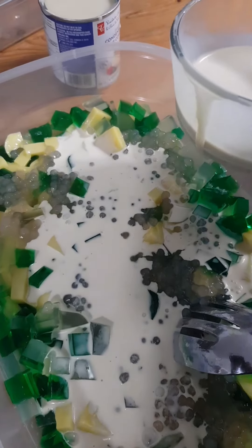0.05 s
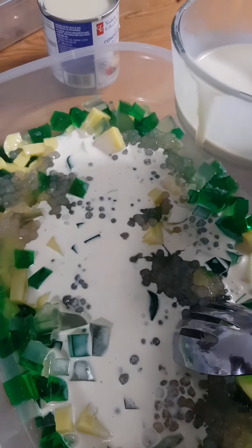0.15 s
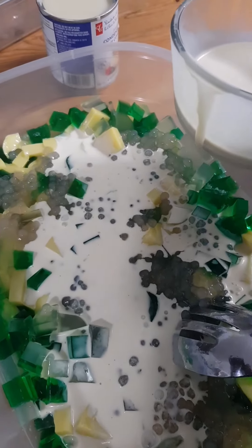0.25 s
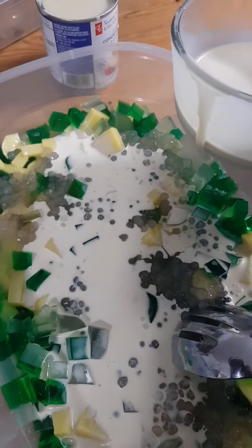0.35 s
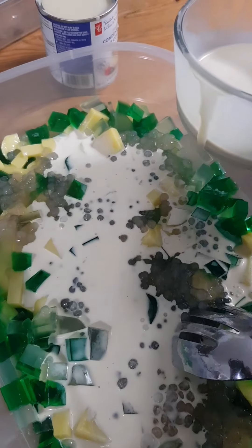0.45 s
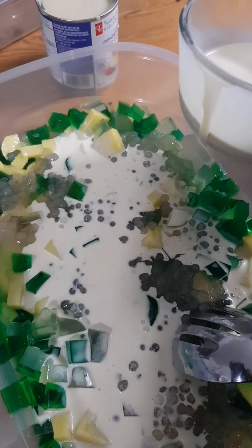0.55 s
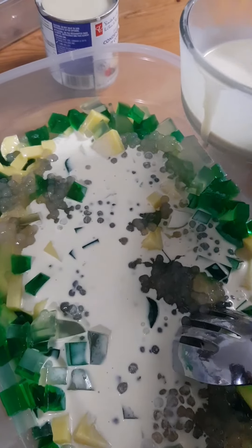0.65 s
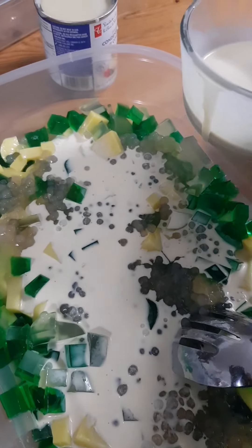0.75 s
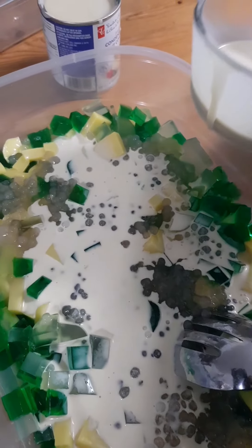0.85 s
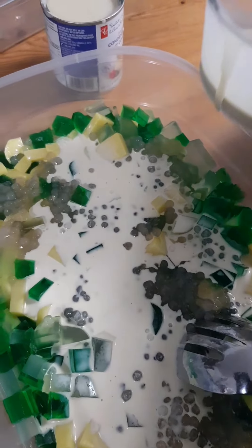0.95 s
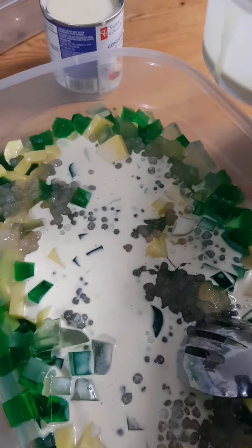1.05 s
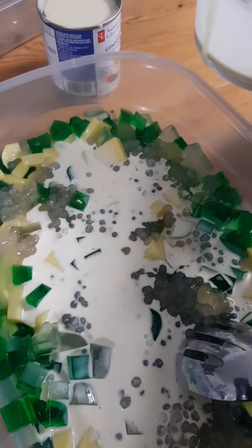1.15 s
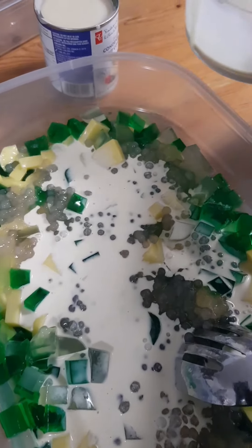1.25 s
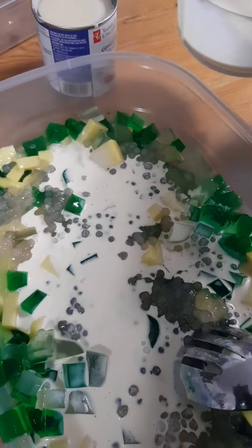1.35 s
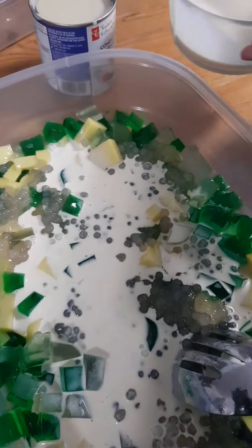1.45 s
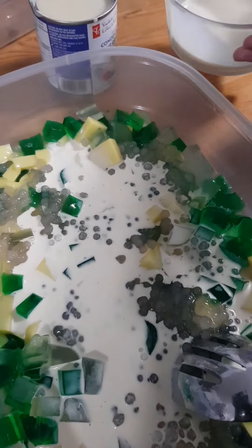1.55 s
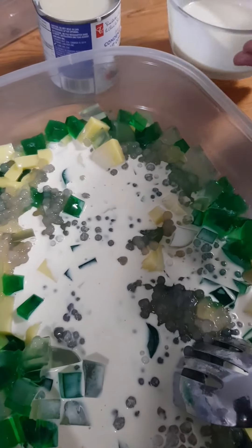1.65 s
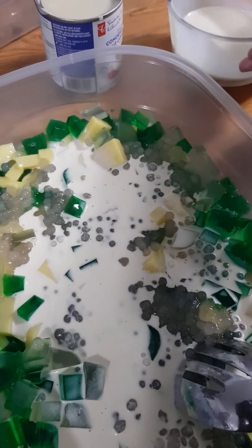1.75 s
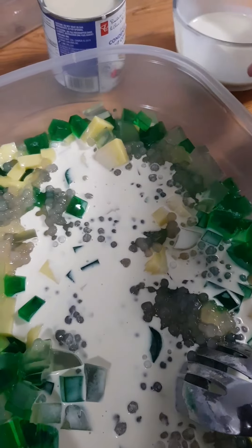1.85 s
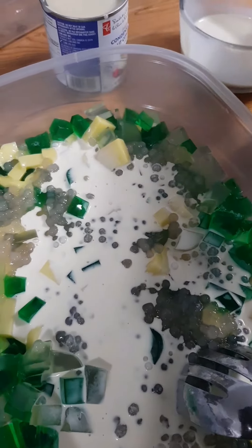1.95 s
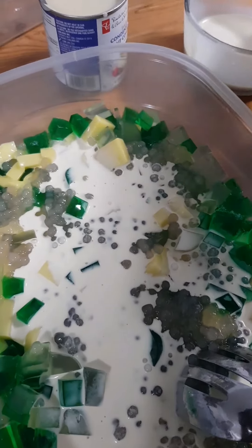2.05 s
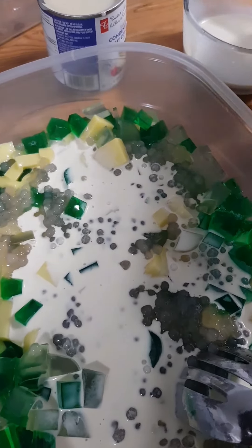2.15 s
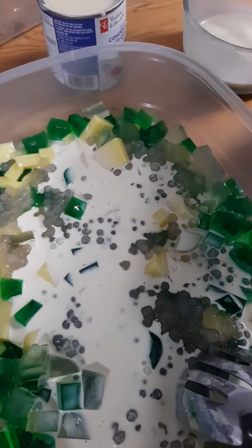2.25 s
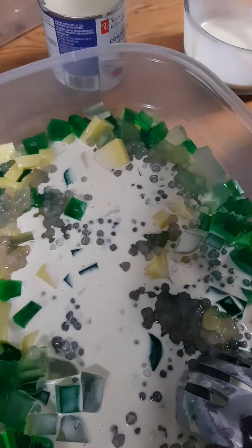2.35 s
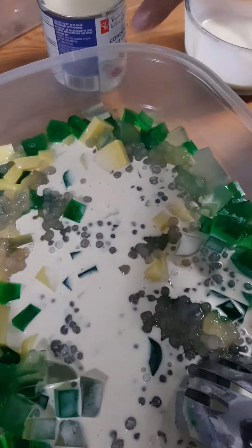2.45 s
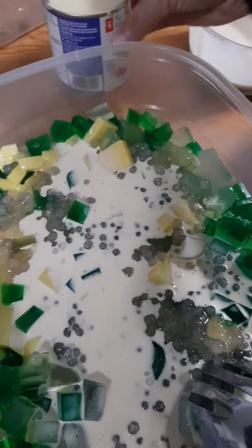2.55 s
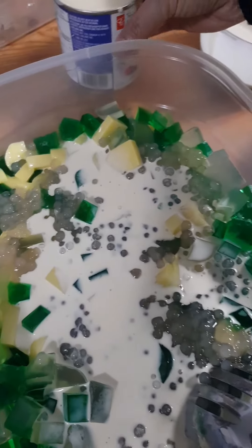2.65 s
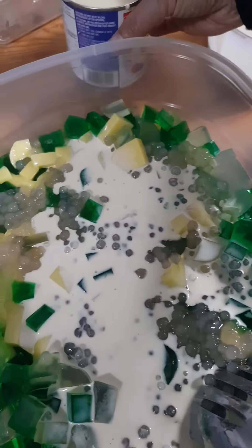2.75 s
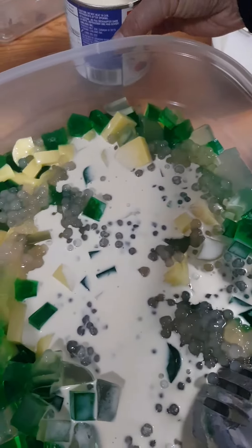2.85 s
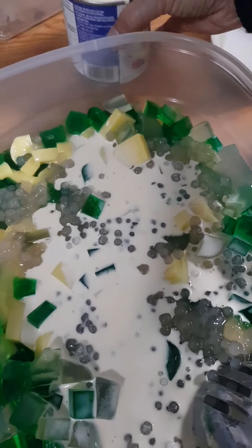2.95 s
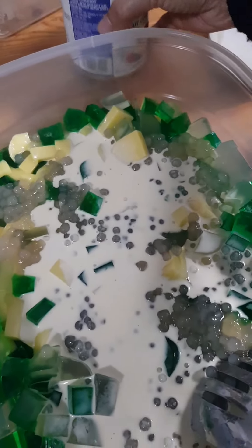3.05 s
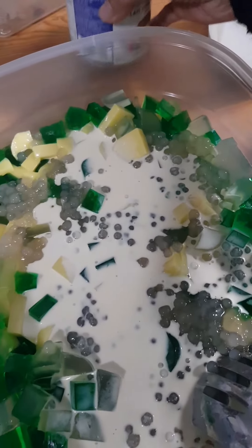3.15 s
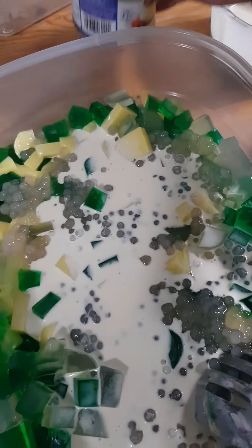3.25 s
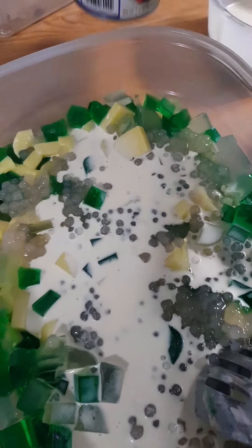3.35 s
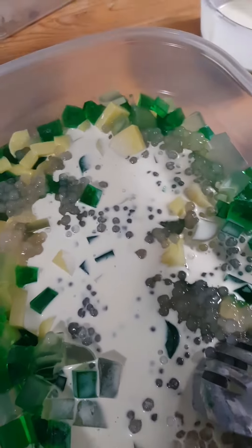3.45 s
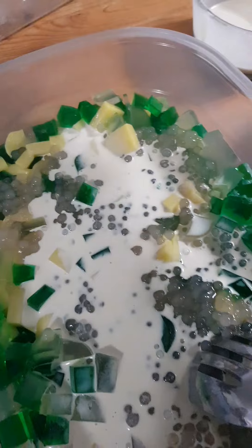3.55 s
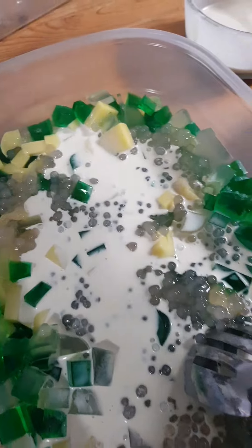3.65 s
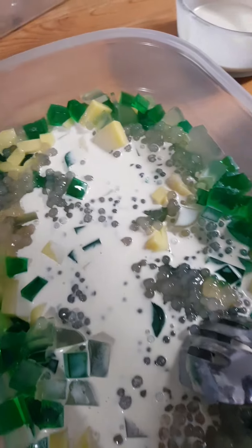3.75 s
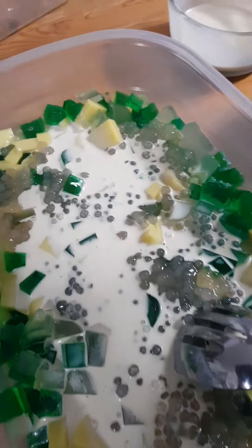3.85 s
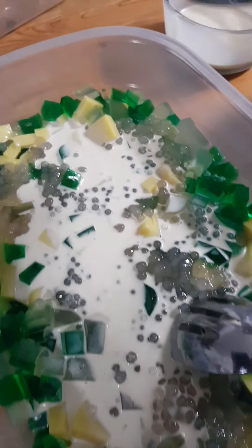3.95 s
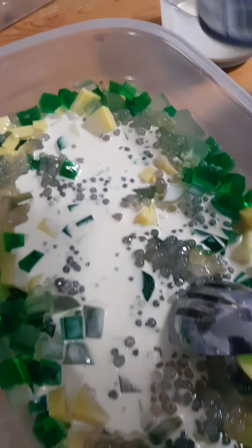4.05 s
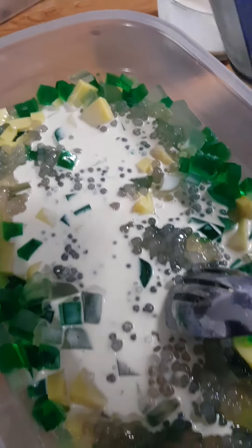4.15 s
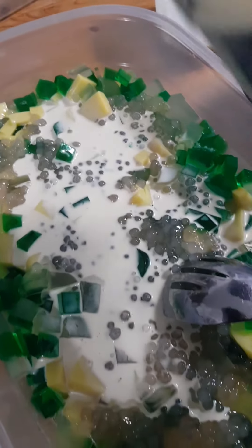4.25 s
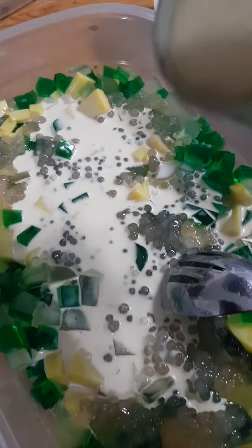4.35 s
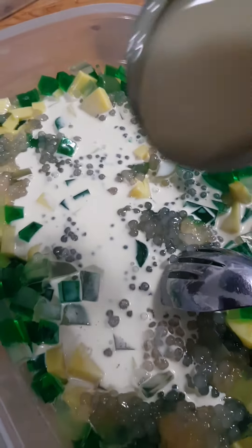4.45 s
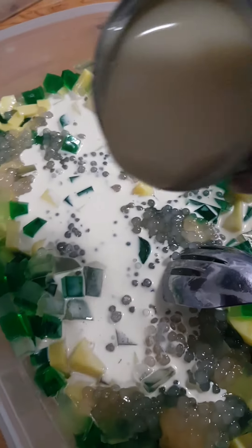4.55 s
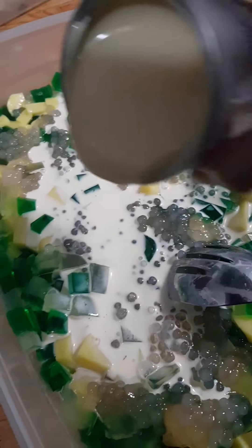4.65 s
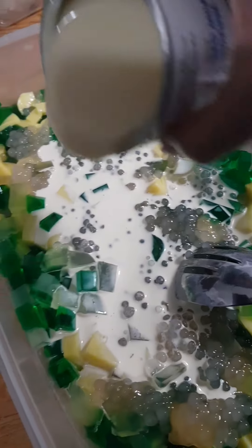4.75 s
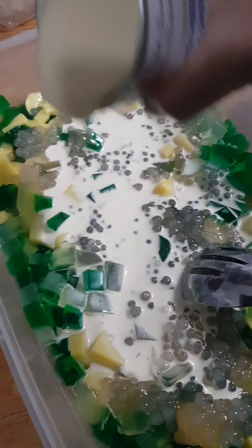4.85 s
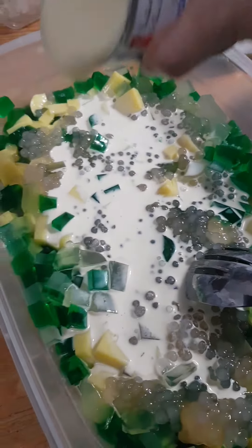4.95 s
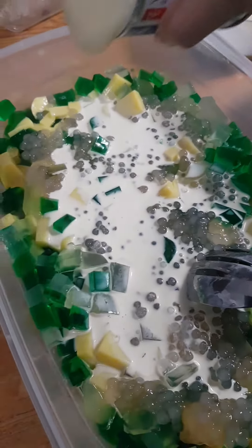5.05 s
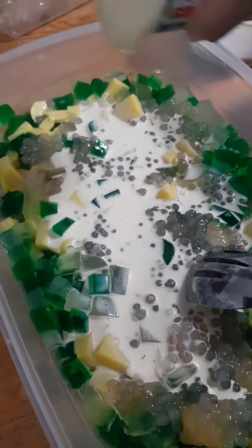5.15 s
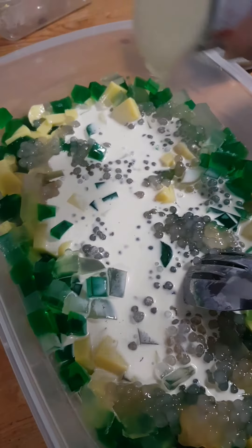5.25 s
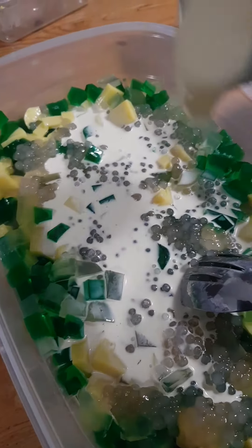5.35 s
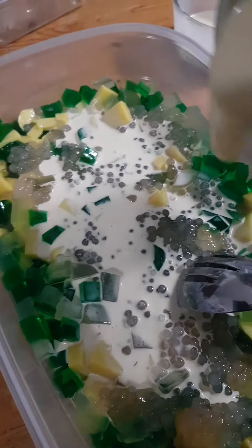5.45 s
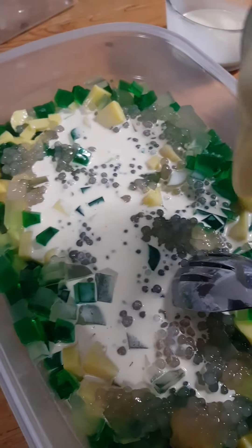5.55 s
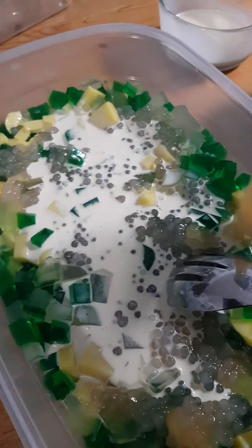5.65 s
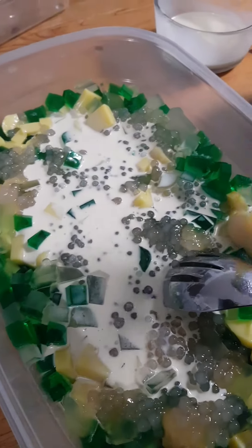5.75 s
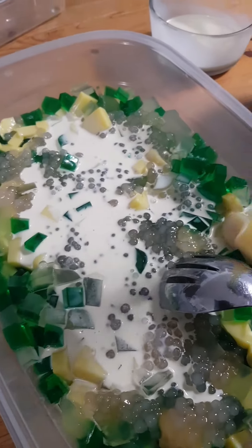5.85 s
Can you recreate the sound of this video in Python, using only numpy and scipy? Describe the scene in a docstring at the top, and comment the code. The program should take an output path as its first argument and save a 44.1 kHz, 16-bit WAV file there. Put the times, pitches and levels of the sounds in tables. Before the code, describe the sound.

A heavy glass bowl knocks once on a wooden table and rattles to rest, then faint can-handling sounds over a low fridge hum.

```python
"""In a kitchen, a glass bowl is set down on a wooden table near a phone: one hard knock, then it rocks and settles.
Each blow is a pulse that rings the table's modes and sets off a short scrape; the glass adds one brief ping.
Fingers tick, tap and rub against a can and a plastic tub: decaying noise bands, short tones and grainy noise.
A fridge hums as a stack of wavering tones, with shaped noise for low rumble and microphone hiss,
and a thin tone that comes and goes. The kitchen answers bowl and fingers with a dense noisy tail."""
import sys
import numpy as np
from scipy import signal
from scipy.fft import rfft, irfft
from scipy.io import wavfile
from scipy.ndimage import uniform_filter1d

SR = 44100
rng = np.random.default_rng(int(sys.argv[2]) if len(sys.argv) > 2 else 0)


def dump_mix(stems):
    """Bounce the given channels to the path in sys.argv[1] as a 16-bit WAV at rate SR."""
    frames = np.atleast_2d(stems).T  # one column per channel
    limited = np.clip(frames, -1, 1)  # hard clip at full scale
    pcm = np.round(limited * 32767).astype(np.int16)
    wavfile.write(sys.argv[1], SR, pcm)


N = 261072  # length in samples
T = np.arange(N) / SR


def undb(db):
    """Decibels to amplitude."""
    return 10 ** (np.asarray(db) / 20)


def unit(x):
    """Scale to an RMS of 1."""
    return x / np.sqrt(np.mean(x ** 2))


def sides(pan_db):
    """Left and right gains that differ by pan_db."""
    return undb(np.array([[pan_db], [-pan_db]]) / 2)


def fade(t, t60):
    """Exponential decay that falls 60 dB in t60 seconds."""
    return np.exp(-np.log(1000) * t / t60)


def on_log(table, hz):
    """Read a table between its points along a log frequency axis."""
    table_hz, values = np.transpose(table)
    return np.interp(np.log(np.maximum(hz, 1)), np.log(table_hz), values)


def band(x, hz, width_hz):
    """Band-pass around hz, edges spaced evenly on a log axis."""
    top = min(width_hz / 2 + np.hypot(hz, width_hz / 2), SR / 2.2)
    bottom = hz * hz / top * .999
    return signal.sosfilt(signal.butter(2, [bottom, top], "band", fs=SR, output="sos"), x)


def walk(rate):
    """Random levels held 1 / rate s and slewed twice; spread near 1."""
    hold = int(SR / rate)
    steps = np.repeat(rng.standard_normal(N // hold + 1), hold)
    return 1.3 * uniform_filter1d(uniform_filter1d(steps, hold), hold)[:N]


# likeness of left and right in diffuse sound: freq_hz, likeness [0-1]
LIKENESS = [(60, 0.81), (290, 0.91), (640, 0.3), (1400, .0)]


def diffuse(size):
    """Stereo noise whose two sides are alike in the bass and unrelated in the treble."""
    mid, side = rfft(rng.standard_normal((2, size)))
    alike = np.clip(on_log(LIKENESS, np.fft.rfftfreq(size, 1 / SR)), 0, 1)
    mid = mid * np.sqrt((1 + alike) / 2)
    side = side * np.sqrt((1 - alike) / 2)
    return irfft(np.array([mid + side, mid - side]), size)


def coloured(x, spectrum):
    """Shape noise by a spectrum in dB and scale it to an RMS of 1."""
    gain = undb(on_log(spectrum, np.fft.rfftfreq(N, 1 / SR)))
    return unit(irfft(rfft(x) * gain, N))


def tail(x, bands, start_s, spread):
    """A dense noisy answer to x that swells in around start_s and dies band by band."""
    t = T[:SR // 2]
    noise, answer = diffuse(len(t)), 0
    swell = np.clip(t / start_s - .5, 0, 1)
    for hz, db, t60 in bands:
        part = band(noise, hz, hz * spread) * fade(t, t60) * swell
        # even out the energy of long and short decays
        answer = answer + undb(db) * part / np.sqrt(t60 * SR / np.log(1e6))
    mono = x.mean(0, keepdims=True)
    return signal.fftconvolve(mono, answer, axes=1)[:, :N]


def burst(s, db, hz, width_hz, t60, pan_db):
    """A short decaying burst in one band; narrow bands build up more slowly."""
    out, t, start = np.zeros((2, N + SR)), T[:SR // 4], int(s * SR)
    noise = band(diffuse(SR // 2), hz, width_hz)[:, SR // 4:]
    x = noise * fade(t, t60) * np.minimum(t * width_hz * 2, 1)
    x = x / np.abs(x).max(1, keepdims=True)
    out[:, start:start + len(t)] = undb(db) * sides(pan_db) * x
    return out[:, :N]


def ring(s, db, hz, t60, pan_db, rise_s):
    """One struck mode: a sine that rises briefly and dies away."""
    t = np.maximum(T - s, 0)
    tone = np.sin(2 * np.pi * hz * t) * fade(t, t60) * np.minimum(t / rise_s, 1)
    return undb(db) * sides(pan_db) * tone


# fridge tones, partly multiples of the compressor speed: pitch_hz, level_db (before HUM_DB)
FRIDGE_TONES = [(58.7, -67), (82.1, -68.5), (164.2, -70.5), (185.7, -67.5), (211.5, -53), (245.6, -64.5),
                (265, -76.5), (293.6, -68), (352.3, -73), (411.3, -67), (423.5, -80), (470, -80),
                (512, -83), (705, -87.5), (881, -90.5)]
# where the hum sits: pitch_hz, left_minus_right_db
HUM_PLACE = [(60, 3.5), (300, 2), (420, -.5), (900, -2)]
HUM_DB, HUM_WAVER_DB, MAIN_WAVER_DB = -0.66, 3, 1.5  # the strongest tone is the steadiest


def fridge():
    """Compressor tones, each drifting in phase and wavering in level."""
    hum, top_db = 0, max(db for _, db in FRIDGE_TONES)
    for hz, db in FRIDGE_TONES:
        phase = 2 * np.pi * (hz * T + rng.random() + 0.25 * walk(5))
        waver_db = MAIN_WAVER_DB if db == top_db else HUM_WAVER_DB
        level = np.sqrt(2) * undb(db + waver_db * walk(6))
        hum = hum + level * sides(on_log(HUM_PLACE, hz)) * np.sin(phase)
    return undb(HUM_DB) * hum


# rumble of the kitchen, relative shape: freq_hz, density_db (per Hz)
RUMBLE_SHAPE = [(22, -7), (40, -4.5), (60, 4), (85, -6), (125, -11.5), (190, -5.5), (260, -7.5), (400, -12),
                (520, -18.5), (640, -24), (900, -29.5), (1400, -39), (2500, -62)]
RUMBLE_DB = -57


def low_rumble():
    """Diffuse noise weighted to the bass, its level wavering by about 1 dB."""
    return undb(RUMBLE_DB) * coloured(diffuse(N), RUMBLE_SHAPE) * undb(walk(11))


# microphone self-noise, relative shape: freq_hz, density_db (per Hz)
HISS_SHAPE = [(710, -35), (1200, -7.5), (1510, -2.5), (2380, -5.5), (5180, -8), (5470, -6.5), (5710, -7.5),
              (8440, -15.5), (12100, 0.5), (14800, 0.5), (16000, -4.5)]
HISS_DB, HISS_PAN_DB = -71, 0.88


def microphone_hiss():
    """Self-noise, independent in each microphone."""
    return undb(HISS_DB) * coloured(rng.standard_normal((2, N)), HISS_SHAPE) * sides(HISS_PAN_DB)


# the thin tone comes and goes: time_s, level_db (before its waver)
WHINE_LEVEL = [(0, -98), (.7, -90), (1.1, -98), (1.4, -110), (5.92, -105)]
WHINE_HZ, WHINE_WAVER_DB = 5464, 5.5


def thin_whine():
    """One steady high sine whose level wavers."""
    level_db = np.interp(T, *np.transpose(WHINE_LEVEL)) + WHINE_WAVER_DB * walk(12)
    return undb(level_db) * np.sin(2 * np.pi * WHINE_HZ * T)


# hum, rumble and hiss swell and sink together: time_s, level_db
SWELL = [(0, -0.2), (.8, -0.3), (1.6, 0.84), (2.2, -1.3), (2.7, -0.8), (3.4, -3), (4.1, -1.3), (4.4, -.1),
         (5.1, -0.94), (5.92, 0.6)]


def background():
    """Fridge, rumble and hiss share one slow swell; the whine keeps its own."""
    steady = fridge() + low_rumble() + microphone_hiss()
    return undb(np.interp(T, *np.transpose(SWELL))) * steady + thin_whine()


# dry little ticks: start_s, peak_db, centre_hz, left_minus_right_db
DRY_TICKS = [(1.6252, -54.5, 6230, -6), (2.053, -67.5, 5470, 11), (3.542, -67, 5600, -5),
             (5.7252, -60, 10800, 1), (5.7254, -65, 6100, -4), (5.748, -64, 6200, -5)]
TICK_WIDTH_HZ, TICK_T60_S = 1900, .022


def ticks():
    """Tiny contacts heard as short noise bursts, each in one treble band."""
    out = 0
    for s, db, hz, pan_db in DRY_TICKS:
        out = out + burst(s, db, hz, TICK_WIDTH_HZ, TICK_T60_S, pan_db)
    return out


# the kitchen's answer: centre_hz, level_db, t60_s
ROOM_BANDS = [(88.8, -12, .3), (170, -4.5, .3), (353.4, -6, 0.29), (716, -4, .3), (1440, -3.5, 0.19),
              (3054, -10.5, .25), (5760, -2.5, .2), (11480, -10.5, 0.16)]


def kitchen(x):
    """Walls and cupboards answer after a few milliseconds."""
    return tail(x, ROOM_BANDS, 0.0049, 0.59)


# bowl foot meets the table: start_s, blow_db, edge [0-1 across the foot]
BLOWS = [(1.8663, -5.5, 0.19), (1.8739, -26, 0), (1.891, -18.5, 0.5), (1.942, -23.5, .6), (1.960, -31, .64),
         (1.989, -24, 1), (2.008, -37, 0.97), (2.031, -42, 1), (2.056, -25, 0.8), (2.0708, -20, 1),
         (2.0779, -25.5, .6), (2.094, -28.5, .9)]
# table modes: pitch_hz, near_db (struck by edge 0), far_db (struck by edge 1), t60_s, left_minus_right_db
TABLE_MODES = [(60, -0.5, -7, .3, 1.5), (87.9, 1, -9.5, 0.15, 2), (124.1, -2.5, -10, 0.17, 2.5),
               (204.7, -20, -22, .15, 3.5), (263.3, -12, -4, 0.0807, 4), (327.3, -14, -14, 0.081, 6.5),
               (350, -11, -2.5, 0.011, 6), (372.7, -9, -18.5, 0.11, -1), (479, -26, -23, 0.061, -8),
               (585.5, -19.5, -23.5, 0.11, 0.5), (661, -24.5, -27.5, .08, -9.5),
               (714, -23.5, -24, .1, -7.5), (793, -29, -29.5, 0.083, -15.5),
               (1037, -21.5, -29.5, 0.073, -0.5), (1168, -27.5, -28.5, 0.101, -9)]
# upper table modes, too dense to tell apart: centre_hz, level_db, t60_s
DENSE_MODES = [(892, -4.5, 0.12), (1270, 2, .2), (1816, 9.5, .17), (2370, 8, .15)]
# gritty scrape of glass on wood: centre_hz, level_db (against the scrape's blow), t60_s
SCRAPE_BANDS = [(3004, -57, 0.2), (5170, -61, .18), (8500, -58, .03), (12500, -60, .05)]
# contact at a 0 dB blow; weaker blows last longer by this share per dB
CONTACT_MS, LONGER_PER_DB = .7, 0.0144
# scrape against its blow; it lessens as the bowl stops sliding
SCRAPE_DB, SETTLE_DB_PER_S = 3.5, -120
JERK_DB = 1
PORT_LAG_MS = 0.29  # the table's sound reaches the right port later


def bowl():
    """Each blow jerks the table top back and forth once, rings its modes and scrapes briefly."""
    near, far, strike = np.zeros((3, N))
    for s, db, edge in BLOWS:
        contact_s = CONTACT_MS / 1000 * (1 - LONGER_PER_DB * db)
        u = (T - s) / contact_s
        pulse = undb(db) * (1 - 3 * u ** 2) / (1 + u ** 2) ** 3  # acceleration under a rounded push
        near += (1 - edge) * pulse
        far += edge * pulse
        scrape_db = db + SCRAPE_DB + SETTLE_DB_PER_S * (s - BLOWS[0][0])
        strike[int((s - 2 * contact_s) * SR)] = undb(scrape_db)

    jerk, t = near + far, T[:SR // 2]
    out = undb(JERK_DB) * jerk + tail(jerk[None], DENSE_MODES, 0.0009, 0.47)
    for hz, near_db, far_db, t60, pan_db in TABLE_MODES:
        mode = np.sin(2 * np.pi * hz * t) * fade(t, t60) * 2 * np.pi * hz / SR
        push = undb(near_db) * near + undb(far_db) * far
        out += sides(pan_db) * signal.fftconvolve(push, mode)[:N]
    out[1] = np.roll(out[1], int(PORT_LAG_MS * SR / 1000))

    grit = diffuse(N)
    for hz, db, t60 in SCRAPE_BANDS:
        envelope = signal.fftconvolve(strike, fade(t, t60))[:N]
        out += undb(db) * envelope * unit(band(grit, hz, hz * .6))
    return out


def glass_ping():
    """The glass rings once, briefly, in a single high mode."""
    return ring(s=1.897, db=-41, hz=4360, t60=.013, pan_db=-5, rise_s=.003)


# fingers grip the can: start_s, level_db, brightness_db (per octave), left_minus_right_db
CAN_GRIPS = [(2.5478, -43, 2, 4.5), (2.5514, -42, 2, 1), (2.578, -42, -2, 5), (2.585, -32.5, -1.2, -0.5)]
# broad rings of the full can: centre_hz, width_hz, level_db (against the grip), t60_s
CAN_RINGS = [(259, 250, -1, 0.052), (725, 700, 1, 0.038), (1900, 1600, -5, .04), (3800, 2000, -8, .03),
             (6500, 3000, -14, .016), (11500, 6000, -17, .02)]


def grips():
    """Each grip excites the full can's broad rings, tilted brighter or duller."""
    out, pivot_hz = 0, CAN_RINGS[1][0]
    for s, db, bright_db, pan_db in CAN_GRIPS:
        for hz, width_hz, ring_db, t60 in CAN_RINGS:
            tilt_db = bright_db * np.log2(hz / pivot_hz)
            out = out + burst(s, db + ring_db + tilt_db, hz, width_hz, t60, pan_db)
    return out


# skin dragged on metal, plastic and cloth: start_s, length_s, level_db, centre_hz
SKIN_RUBS = [(2.549, .12, -62, 12500), (2.553, 0.074, -52, 2000), (2.586, .13, -62, 2400),
             (2.76, .085, -76, 5500), (2.984, 0.21, -63, 589), (4.234, 0.082, -70, 1500),
             (4.44, .11, -70, 1370), (5.718, 0.35, -73.5, 6100), (5.722, .1, -71, 11000),
             (5.844, 0.09, -71, 690)]
RUB_WIDTH = .6  # share of the centre


def rubs():
    """Grainy friction that starts quickly and thins out."""
    noise, out = diffuse(N) * undb(0.88 * walk(370)), 0
    for s, length_s, db, hz in SKIN_RUBS:
        u = np.clip((T - s) / length_s, 0, 1)
        shape = np.minimum(u / .15, 1) * (1 - u) ** 2
        out = out + shape * undb(db) * unit(band(noise, hz, hz * RUB_WIDTH))
    return out


# soft hollow taps: start_s, level_db, pitch_hz, left_minus_right_db
HOLLOW_TAPS = [(4.2334, -57, 1016, -9), (4.4365, -58.5, 1325, -7)]
TAP_T60_S = .03
OVERTONE, OVERTONE_DB = 1.82, -5.5  # second mode: pitch ratio and level against the first


def taps():
    """A pure low mode under a noisier, shorter second mode."""
    out = 0
    for s, db, hz, pan_db in HOLLOW_TAPS:
        over_hz = hz * OVERTONE
        out = out + ring(s, db, hz, TAP_T60_S, pan_db, rise_s=.0012)
        out = out + burst(s, db + OVERTONE_DB, over_hz, hz * .25, TAP_T60_S / OVERTONE, pan_db)
    return out


def scene():
    """Bowl and fingers, the kitchen's answer to them, and the background."""
    touch = ticks() + grips() + rubs() + taps()
    knock, ping = bowl(), glass_ping()
    to_room = knock + undb(-8) * ping + undb(0.5) * touch
    return knock + ping + touch + kitchen(to_room) + background()


BOTTOM_HZ, TOP_HZ = 42.3, 15550


def record(dry):
    """The phone drops the deepest bass and cuts the top steeply."""
    lean = signal.sosfilt(signal.butter(4, BOTTOM_HZ, "high", fs=SR, output="sos"), dry)
    return signal.sosfilt(signal.ellip(12, .2, 80, TOP_HZ, fs=SR, output="sos"), lean)


dry = scene()
out = record(dry)
dump_mix(out)
```